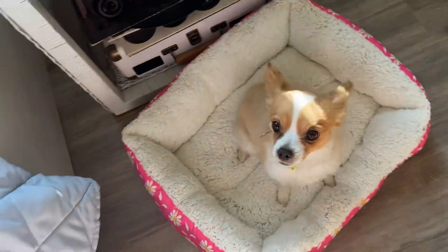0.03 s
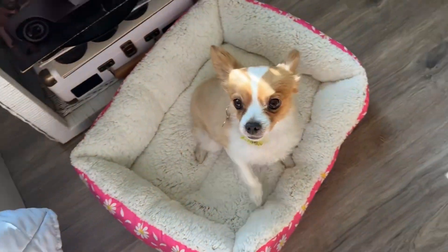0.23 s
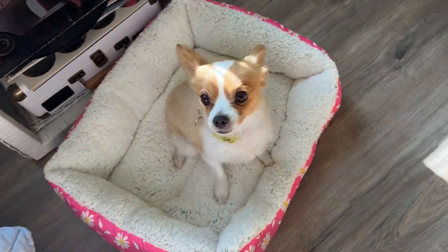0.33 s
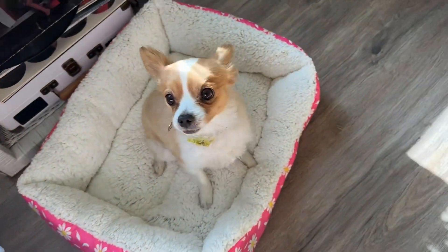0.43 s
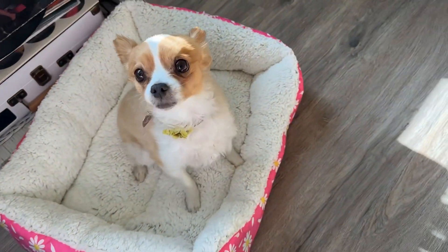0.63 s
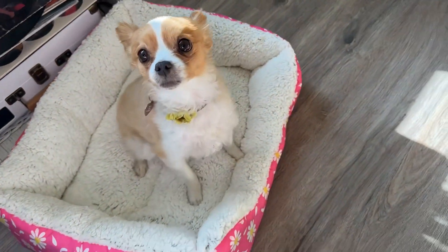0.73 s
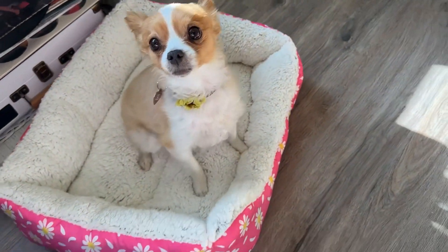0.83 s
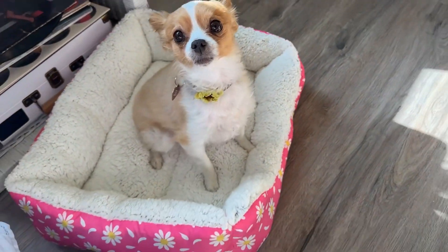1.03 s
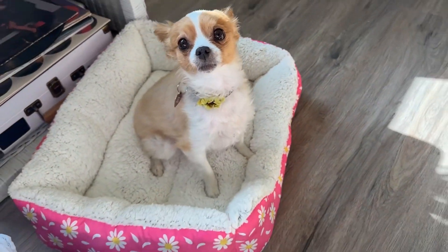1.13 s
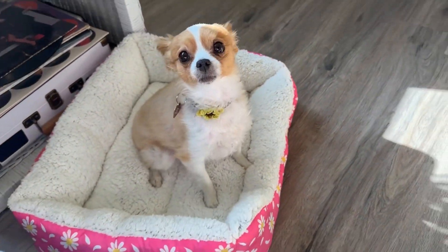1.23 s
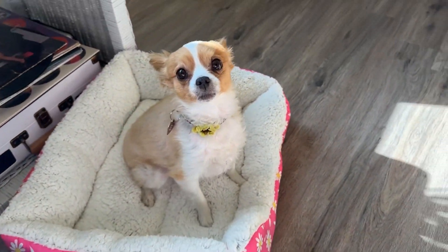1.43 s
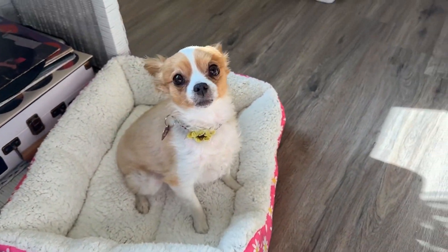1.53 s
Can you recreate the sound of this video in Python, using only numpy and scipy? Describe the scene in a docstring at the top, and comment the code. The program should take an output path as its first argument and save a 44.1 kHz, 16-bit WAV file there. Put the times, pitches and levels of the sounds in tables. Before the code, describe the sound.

Muffled heel thuds, brushing soles and little clicks move over indoor floorboards while cloth rustles near a handheld microphone; a brief swish follows, then a thin, husky high whimper from a small dog, over low room tone.

```python
"""A quiet room with a wooden floor: someone steps softly round a small dog's bed.
Heels thud as short tones of falling pitch and ring the floor's modes; soles scuff and slide as grainy noise.
Small hard contacts tick as resonant noise; clothing rustles and crackles near the microphone as treble noise.
Towards the end the dog gives one thin, faint, wavering whine, a husky sine with a weak octave."""
import sys
import numpy as np
from scipy import signal
from scipy.fft import rfft, irfft, next_fast_len
from scipy.io import wavfile
from scipy.ndimage import map_coordinates

SR = 44100
rng = np.random.default_rng(int(sys.argv[2]) if len(sys.argv) > 2 else 0)


def digitize_waveform(pressure):
    """Quantize a signal to 16-bit integers and store it at the path in sys.argv[1].

    Rows of a 2-D input are taken as channels; values are limited to [-1, 1].
    """
    field = np.atleast_2d(pressure).T
    bounded = np.clip(field, -1, 1)
    quanta = np.round(bounded * 32767).astype(np.int16)
    wavfile.write(sys.argv[1], SR, quanta)


N = 70560


def amp(db):
    """Decibels to gain."""
    return 10 ** (np.asarray(db) / 20)


def unit_rms(x):
    """Scale to rms 1."""
    return x / np.sqrt(np.mean(x ** 2) + 1e-20)


def along(points, hz):
    """Interpolate (frequency [Hz], value) points on a log frequency axis."""
    point_hz, value = np.transpose(points)
    return np.interp(np.log(hz + 1), np.log(point_hz + 1), value)


def since(start_s):
    """Seconds after start_s, zero before it."""
    return np.maximum(np.arange(N) / SR - start_s, 0)


def curves(rows):
    """One value per sample for each column after the time."""
    time_s, *columns = np.transpose(rows)
    return [np.interp(since(0), time_s, column) for column in columns]


def wobble(knots_per_s):
    """A smooth random curve through normally distributed knots."""
    return map_coordinates(rng.standard_normal(4096), [since(0) * knots_per_s], mode="wrap")


def fade(t, t60_s):
    """Exponential decay, 60 dB down after t60_s."""
    return np.exp(-np.log(1000) * t / t60_s)


def burst(start_s, rise_s, t60_s):
    """A straight rise, then an exponential decay."""
    return np.minimum(since(start_s) / rise_s, 1) * fade(since(start_s + rise_s), t60_s)


def filtered(x, response):
    """Multiply the spectrum of x by a zero-phase response of frequency."""
    size = next_fast_len(N + SR // 4)
    return irfft(rfft(x, size) * response(np.fft.rfftfreq(size, 1 / SR)), size)[..., :N]


def pan(x, left_db):
    """Make left louder than right by left_db."""
    return x * amp(np.array([[1], [-1]]) * left_db / 2)


# likeness of the two microphones for diffuse sound: (frequency [Hz], left-right correlation)
MIC_CORRELATION = [(60, 0.81), (200, 0.84), (500, 0.62), (1000, 0.088), (1700, -0.3), (3000, 0.16),
                   (5300, -0.017), (7300, 0.22), (8600, 0.74), (9600, -0.037), (10500, -1.007),
                   (12100, -0.96), (13000, 0.12), (13800, 1)]


def spread(pair, direct):
    """Unrelated signals become left and right; direct sound makes them more alike below the treble."""
    def mid_side_shares(hz):
        diffuse = along(MIC_CORRELATION, hz)
        correlation = diffuse + (1 - diffuse) * direct / (1 + (hz / 4500) ** 4)
        angle = np.arccos(np.clip(correlation, -1, 1)) / 2
        return np.array([np.cos(angle), np.sin(angle)])
    mid, side = filtered(pair, mid_side_shares)
    return np.array([mid + side, mid - side])


def noise(colour_db, direct=0):
    """Stereo noise of rms 1; colour_db maps frequency to dB."""
    white = rng.standard_normal((2, N))
    coloured = filtered(white, lambda hz: amp(colour_db(hz)))
    return unit_rms(spread(coloured, direct))


def friction(colour_db, grain_db, knots_per_s, direct=0):
    """Noise broken into small catches of random size, at rms 1."""
    return unit_rms(noise(colour_db, direct) * amp(grain_db * wobble(knots_per_s)))


# reverberation: (frequency [Hz], t60 [s])
ROOM_T60 = [(100, 0.37), (1000, 0.25), (10000, 0.18)]


def room(x):
    """The short tail of a furnished room: noise whose bands decay at their own rates."""
    tail_noise = spread(rng.standard_normal((2, N)), 0)[:, :SR // 2]
    hz, t, bands = signal.stft(tail_noise, SR, nperseg=256)
    decaying = bands * fade(t, along(ROOM_T60, hz)[:, None])
    tail = signal.istft(decaying, SR, nperseg=256)[1]
    mono = x.mean(axis=0)[None]
    return signal.fftconvolve(mono, tail / np.linalg.norm(tail[0]), axes=1)[:, :N]


# room tone colour: (frequency [Hz], relative level [dB])
AIR_COLOUR = [(25, -3), (50, 2.5), (95, 1.5), (250, -4.5), (550, -8.5), (900, -7), (1550, -9), (2200, -18),
              (4000, -18.5), (8500, -26), (12000, -33.5), (16000, -37)]
AIR_DB = -61


def room_tone():
    """Steady, mostly low noise of the quiet room."""
    return amp(AIR_DB) * noise(lambda hz: along(AIR_COLOUR, hz))


# cloth rubbing: (time [s], level [dB])
RUSTLE_LEVEL = [(0, -55), (.15, -60.5), (.24, -53.5), (.37, -62), (.5, -57.5), (.57, -66), (.7, -62.5),
                (.76, -57.5), (.835, -62), (.875, -53.5), (1.07, -54.5), (1.15, -58), (1.21, -67),
                (1.28, -63), (1.44, -61), (1.52, -88), (1.6, -68)]
# rubbing colour: (frequency [Hz], relative level [dB])
RUSTLE_COLOUR = [(300, 7.5), (1500, 10.5), (3500, 4), (6000, 7), (7300, 4), (8700, 4.5), (11000, -4),
                 (14000, -1.5), (16000, -14)]
# folds giving way: (time [s], level [dB], t60 [s], tilt above 3 kHz [dB/octave])
CRACKLES = [(0.067, -46.5, 0.024, 6.5), (0.1454, -47, 0.019, 6), (0.189, -51.5, 0.45, 1),
            (.302, -59, 0.0075, 0), (0.32, -46.5, 0.0092, 6), (0.435, -50.5, 0.41, -4.5),
            (0.4426, -44, 0.047, 6.5), (0.4903, -41.5, 0.031, 9.5), (.66, -53, 0.15, -4.5),
            (0.677, -49, 0.12, -5), (0.7466, -50, 0.035, -10), (0.8619, -45, .05, 6),
            (1.058, -44, 0.017, 15.5), (1.2374, -52, 0.25, -5.5), (1.538, -52.5, 0.22, -4)]
# crackle colour before tilt: (frequency [Hz], relative level [dB])
CRACKLE_COLOUR = [(500, -52), (2000, -4), (4000, -6), (6000, 5), (8500, 6), (11000, 4.5), (14000, 0),
                  (16000, -10)]
CRACKLE_RISE_S = 0.0024


def clothing():
    """Cloth rubs all the time and crackles where a fold gives way."""
    level_db, = curves(RUSTLE_LEVEL)
    out = amp(level_db) * friction(lambda hz: along(RUSTLE_COLOUR, hz), grain_db=1.5, knots_per_s=420)
    for start_s, db, t60_s, tilt in CRACKLES:
        def colour_db(hz):
            return along(CRACKLE_COLOUR, hz) + tilt * np.log2(np.maximum(hz, 3000))
        crackle = friction(colour_db, grain_db=2.5, knots_per_s=600)
        out += amp(db) * burst(start_s, CRACKLE_RISE_S, t60_s) * crackle
    return out


# footfalls and weight shifts:
# (time [s], thud level [dB], settled pitch [Hz], thud length, twice the rise [s], floor ring level [dB])
STEPS = [(.04, -51, 79, 0.03, -63), (.095, -43.5, 85, 0.017, -58), (.1225, -29.5, 105.1, 0.03, -22.5),
         (.216, -50, 111, 0.02, -56), (.299, -48, 96, .02, -62), (.4335, -38, 112.2, 0.024, -37),
         (.585, -60, 89, 0.022, -67), (.6775, -32, 109.5, .016, -46.5), (.716, -40.5, 125, 0.018, -37),
         (.752, -37.5, 100.5, 0.024, -37), (.84, -49.5, 160.2, .07, -64), (.93, -55, 158, 0.042, -50),
         (1.3215, -33, 139, 0.018, -44), (1.356, -35.5, 136, 0.0066, -43.5)]
# floor modes: (frequency [Hz], relative level [dB], t60 [s])
FLOOR_MODES = [(72, -1, 0.25), (97.8, 4.5, 0.26), (117.8, -8, 0.21), (166.6, -17, 0.22), (209.8, -3, 0.057),
               (284.5, -17, 0.21), (329, -26.5, 0.25)]
MODE_RISE_S = 0.0092
SWEEP_RATIO, SWEEP_S = 0.95, 0.003  # extra pitch at the start, as a share, and its time constant
THUD_ROOM_DB = -17.5


def footfalls():
    """Heels thud with falling pitch, as boards carry higher pitches first, and set the floor ringing."""
    out = np.zeros(N)
    for start_s, thud_db, hz, length_s, ring_db in STEPS:
        t = since(start_s)
        u = 2 * t / length_s
        envelope = u * np.exp((1 - u * u) / 2)  # peaks at 1 when u = 1
        cycles = hz * (t + SWEEP_RATIO * SWEEP_S * (1 - np.exp(-t / SWEEP_S)))
        out -= amp(thud_db) * envelope * np.sin(2 * np.pi * cycles - np.pi / 2)
        ring = sum(amp(mode_db) * fade(t, t60_s) * np.sin(2 * np.pi * mode_hz * t)
                   for mode_hz, mode_db, t60_s in FLOOR_MODES)
        out -= amp(ring_db) * (1 - np.exp(-t / MODE_RISE_S)) * ring
    out = pan(out, left_db=-0.7)
    return out + amp(THUD_ROOM_DB) * room(out)


# small hard contacts on the boards: (time [s], level [dB], resonance [Hz], t60 [s])
TICKS = [(0.1123, -40, 2610, 0.015), (.1135, -32.5, 290, 0.02), (.1905, -44, 1120, 0.031),
         (0.254, -53, 2280, 0.015), (.672, -50, 790, 0.19), (0.6947, -35, 2290, 0.018),
         (.696, -40.5, 1330, 0.017), (0.698, -50, 522, 0.3), (.74, -47, 833, 0.041),
         (.772, -54.5, 2420, 0.028), (0.826, -52.5, 2300, 0.024), (0.837, -45.5, 716, 0.067),
         (1.537, -61, 2310, 0.082)]
TICK_HALF_WIDTH_OCTAVES = 0.15  # to -6 dB


def ticks():
    """Brief woody clicks: noise bursts, each in one broad resonance."""
    out = np.zeros((2, N))
    for start_s, db, centre_hz, t60_s in TICKS:
        def resonance_db(hz):
            octaves = np.log2((hz + 1) / centre_hz)
            return -20 * np.log10(1 + (octaves / TICK_HALF_WIDTH_OCTAVES) ** 2)
        out += amp(db) * burst(start_s, 0.0002, t60_s) * noise(resonance_db, direct=0.65)
    return out


# soles brushing the floor: (time [s], level [dB], rise [s], t60 [s])
SCUFFS = [(0.113, -41, 0.0059, 0.2), (0.191, -53.5, .01, 0.2), (0.666, -40.5, 0.013, 0.15),
          (0.734, -49.5, 0.007, 0.33), (0.824, -47, 0.026, 0.09), (1.316, -41.5, 0.0052, 0.047),
          (1.432, -54.5, 0.027, 0.068)]
# scuff colour: (frequency [Hz], relative level [dB])
SCUFF_COLOUR = [(60, 1), (150, 1.5), (300, 4), (550, -9.5), (850, -12.5), (1300, -11), (2500, -18.5),
                (4000, -24), (12000, -29.5)]


def scuffs():
    """The sole brushes the boards as it lands or lifts: bursts of low grainy noise."""
    level = sum(amp(db) * burst(start_s, rise_s, t60_s) for start_s, db, rise_s, t60_s in SCUFFS)
    brush = friction(lambda hz: along(SCUFF_COLOUR, hz), grain_db=0.5, knots_per_s=300, direct=0.27)
    return pan(level * brush, left_db=1)


# soles sliding, rise and fall to -5 dB:
# (peak time [s], level [dB], rise [s], fall [s], tilt above 800 Hz [dB/octave])
SLIDES = [(.24, -60, 0.059, 0.13, -1.5), (.59, -64.5, 0.19, 0.18, 0.5), (0.997, -45, 0.032, 0.03, 0.5),
          (1.102, -56, 0.021, 0.025, -4.5), (1.261, -54.5, 0.022, 0.065, -9.5)]
# slide colour before tilt: (frequency [Hz], relative level [dB])
SLIDE_COLOUR = [(150, -44), (300, -12), (700, -10), (1150, -2), (1550, 0.5), (1950, -5.5), (2300, 0),
                (2750, -0.5), (3150, -10.5), (5000, -14), (8200, -19), (11000, -25.5), (16000, -33)]


def slides():
    """A sole swishes along the floor, its noise swelling and fading with its speed."""
    out, t = np.zeros((2, N)), since(0)
    for peak_s, db, rise_s, fall_s, tilt in SLIDES:
        def colour_db(hz):
            return along(SLIDE_COLOUR, hz) + tilt * np.log2(np.maximum(hz, 800))
        phase = (t - peak_s) / np.where(t < peak_s, rise_s, fall_s)
        speed = 1 / np.cosh(np.clip(phase * 1.175, -20, 20))
        out += amp(db) * speed * friction(colour_db, grain_db=1.24, knots_per_s=390, direct=0.69)
    return pan(out, left_db=-2.2)


# the dog's whine: (time [s], pitch [Hz], level [dB])
WHINE = [(1.22, 1690, -73), (1.242, 1658, -56), (1.28, 1648, -57.5), (1.3, 1572, -63.5), (1.316, 1582, -51),
         (1.335, 1630, -64.5), (1.385, 1660, -59), (1.425, 1670, -69), (1.47, 1646, -64),
         (1.535, 1650, -69), (1.575, 1620, -91)]
PITCH_JITTER, LEVEL_FLUTTER_DB = 0.022, 1.2  # jitter as a share of pitch
OVERTONE_DB, HUSK_DB, HUSK_WIDTH_HZ = -35, -3, 75
WHINE_ROOM_DB = -7.5


def whine():
    """A thin nasal whistle of unsteady pitch, husky with narrow noise round it, and a weak octave."""
    hz, db = curves(WHINE)
    phase = 2 * np.pi * np.cumsum(hz * (1 + PITCH_JITTER * wobble(170))) / SR
    sounding = (since(WHINE[0][0]) > 0) & (since(WHINE[-1][0]) == 0)
    husk_sin = wobble(2 * HUSK_WIDTH_HZ) * np.sin(phase)
    husk_cos = wobble(2 * HUSK_WIDTH_HZ) * np.cos(phase)
    husk = (husk_sin + husk_cos) / np.sqrt(2)
    tone = np.sin(phase) + amp(OVERTONE_DB) * np.sin(2 * phase) + amp(HUSK_DB) * husk
    level = amp(db + LEVEL_FLUTTER_DB * wobble(59.86))
    voice = pan(sounding * level * tone, left_db=-1.0)
    return voice + amp(WHINE_ROOM_DB) * room(voice)


SOLE_ROOM_DB, TICK_ROOM_DB = -4, -4


def scene():
    """Feet, clothing and dog over the room tone; the clothing is near and dry."""
    clicks = ticks()
    soles = scuffs() + slides()
    wet = room(amp(SOLE_ROOM_DB) * soles + amp(TICK_ROOM_DB) * clicks)
    return room_tone() + clothing() + footfalls() + clicks + soles + wet + whine()


# microphone balance: (frequency [Hz], left minus right [dB])
MIC_BALANCE = [(100, -0.5), (2500, -0.6), (4500, 0.5), (6000, 2.5), (7100, 6.5), (8300, 0.5), (12000, 0)]
LOW_CUT_HZ, TOP_HZ = 50, 16200


def record(dry):
    """The two microphones differ in colour, lose the deepest bass and pass nothing above TOP_HZ."""
    def response(hz):
        low_cut = 1 / np.sqrt(1 + (LOW_CUT_HZ / (hz + 1)) ** 6)
        return pan((hz < TOP_HZ) * low_cut, along(MIC_BALANCE, hz))
    return filtered(dry, response)


dry = scene()
out = record(dry)
digitize_waveform(out)
```